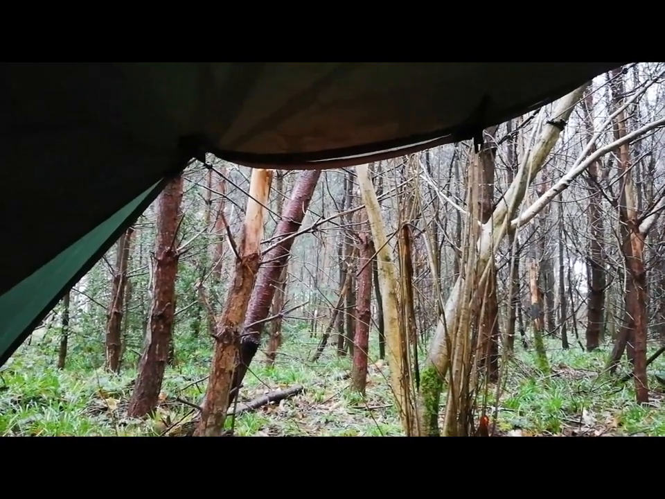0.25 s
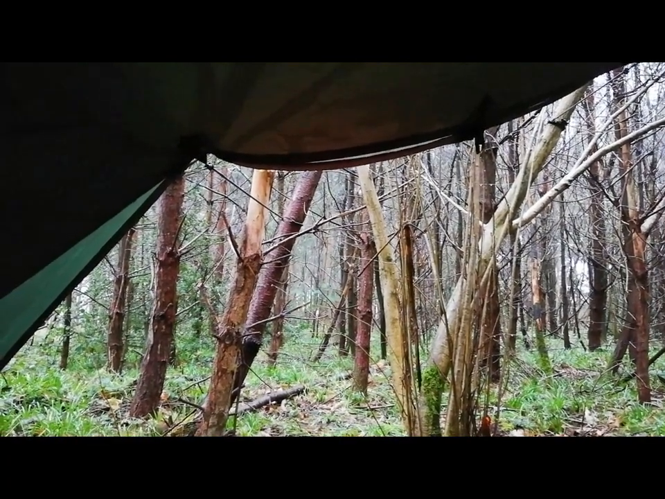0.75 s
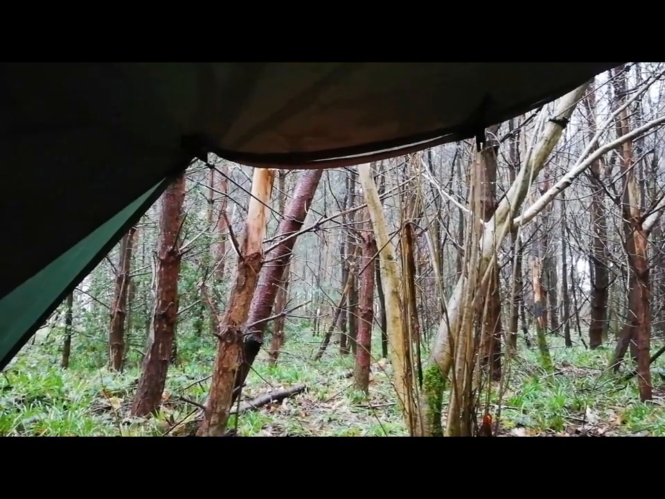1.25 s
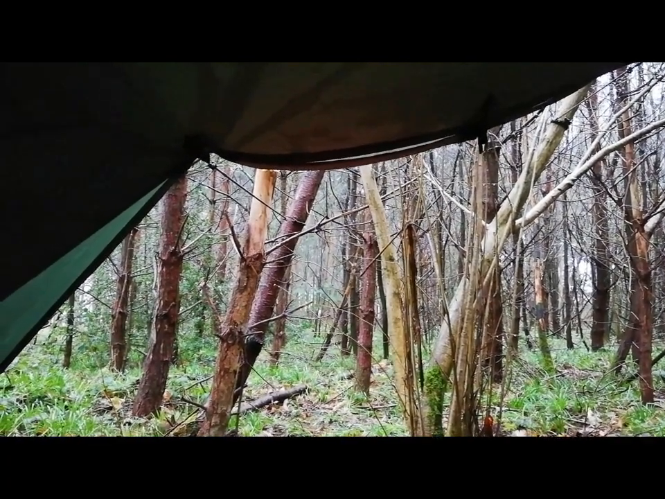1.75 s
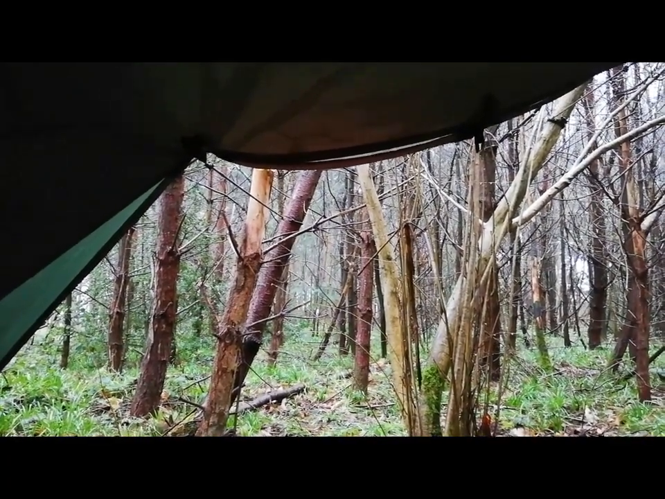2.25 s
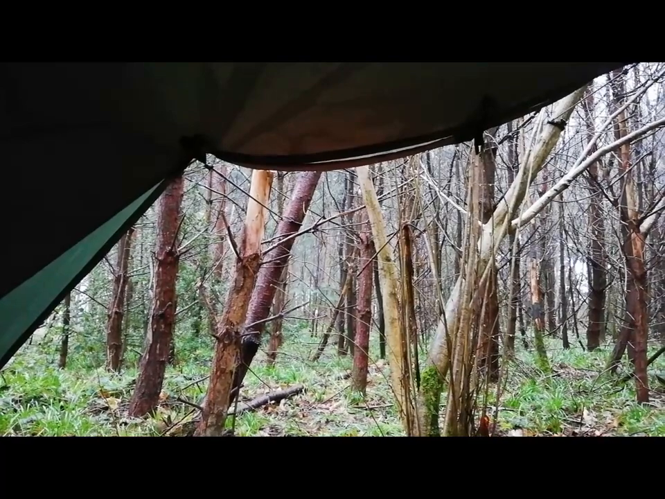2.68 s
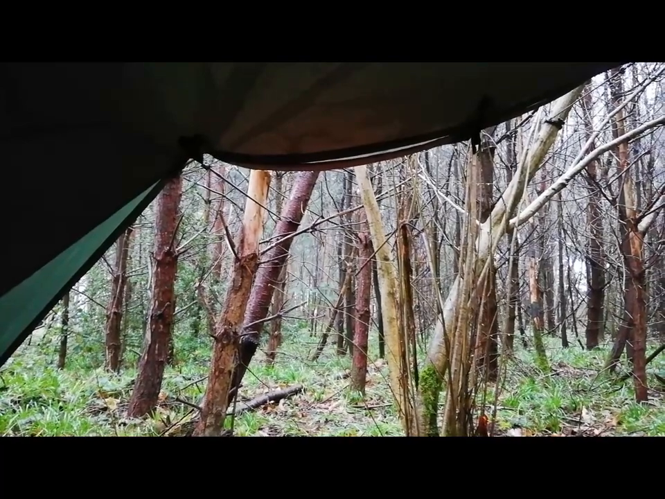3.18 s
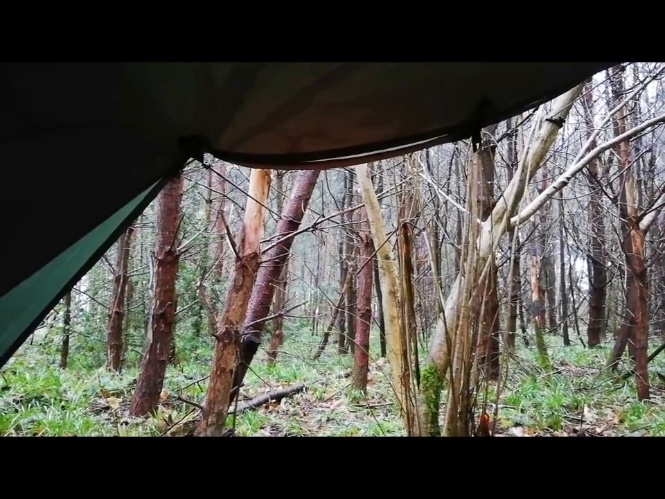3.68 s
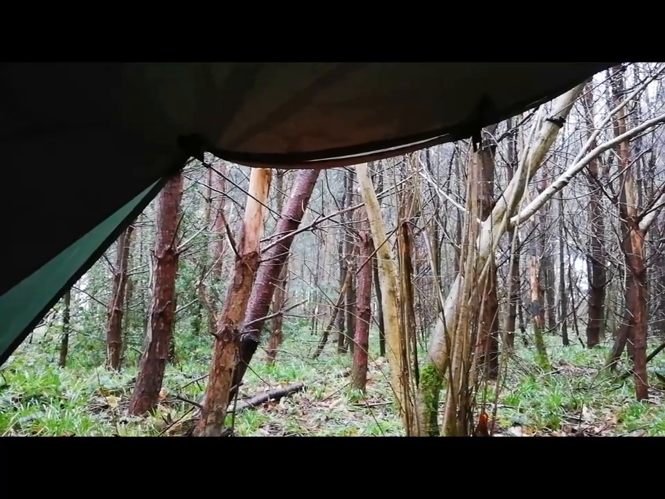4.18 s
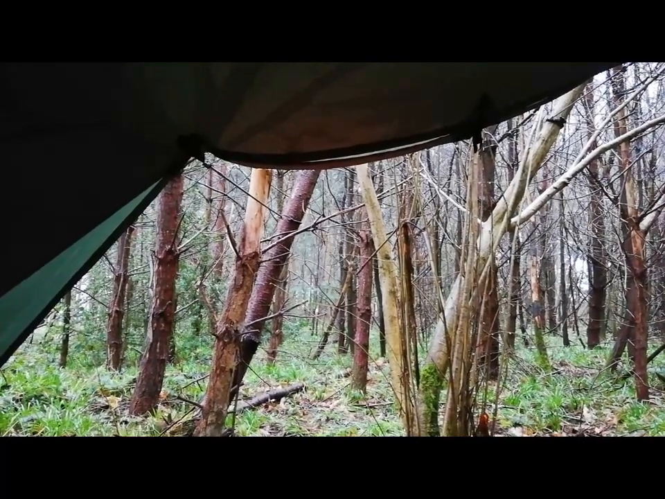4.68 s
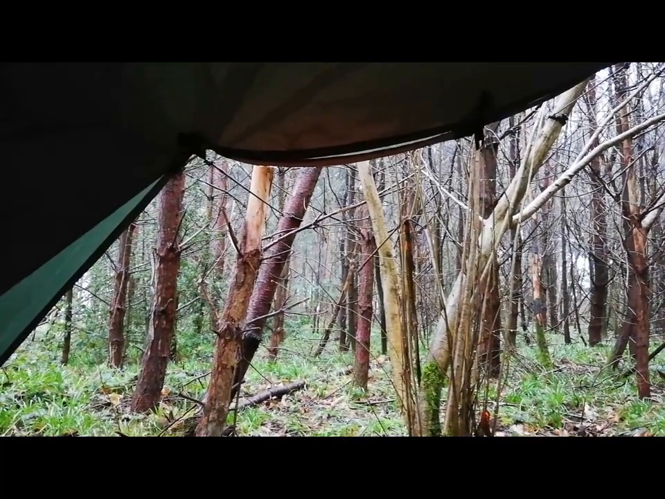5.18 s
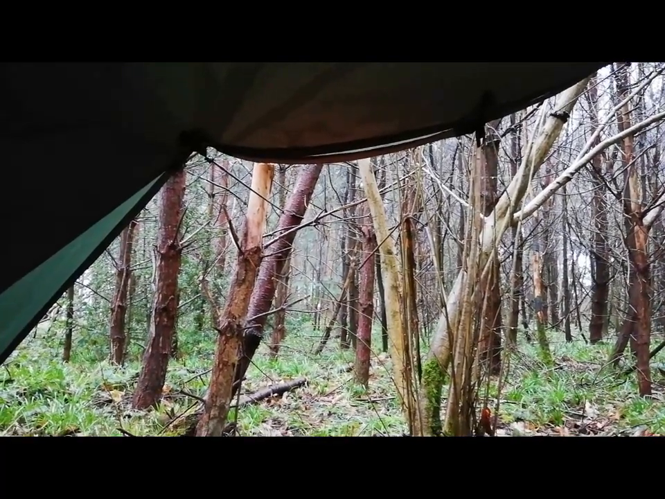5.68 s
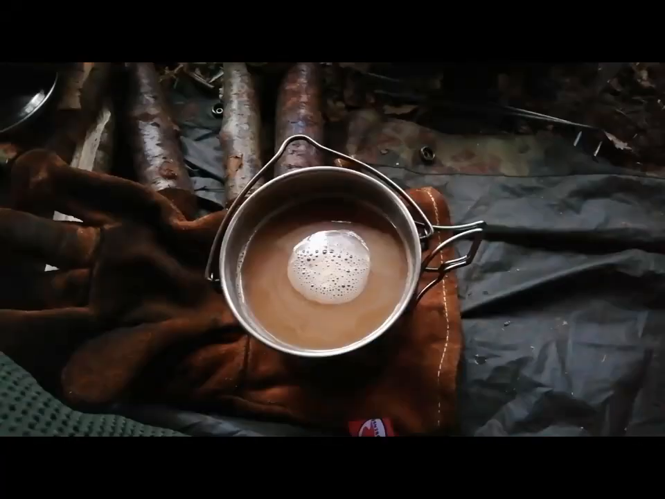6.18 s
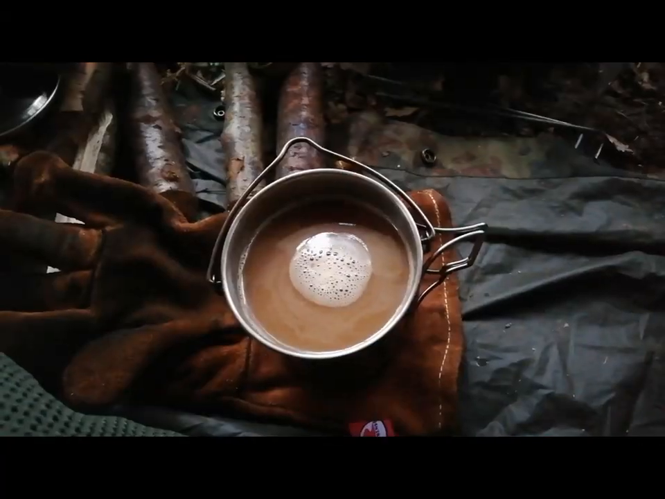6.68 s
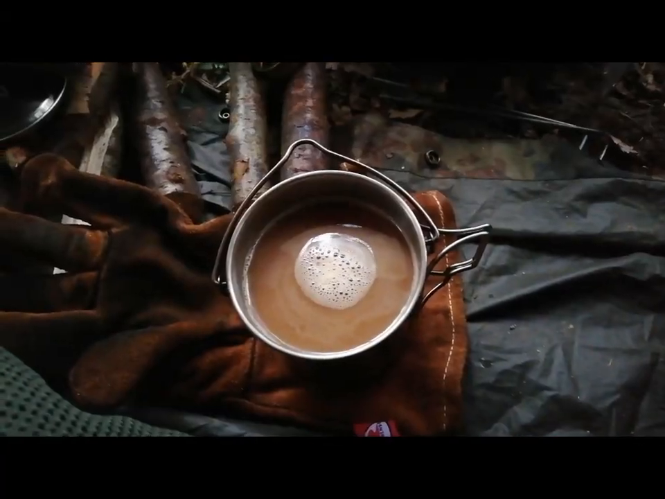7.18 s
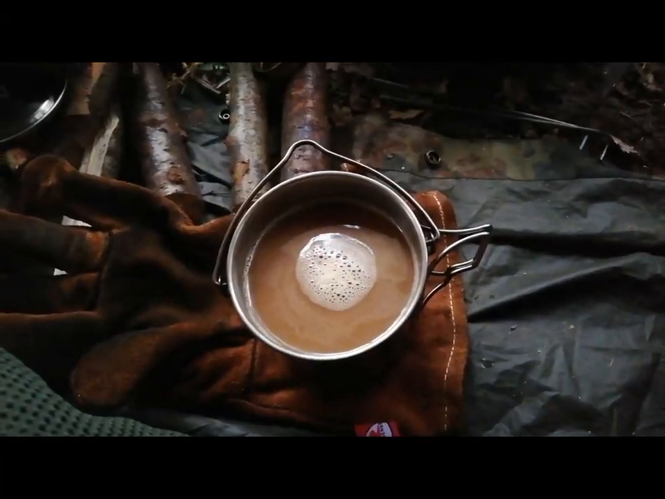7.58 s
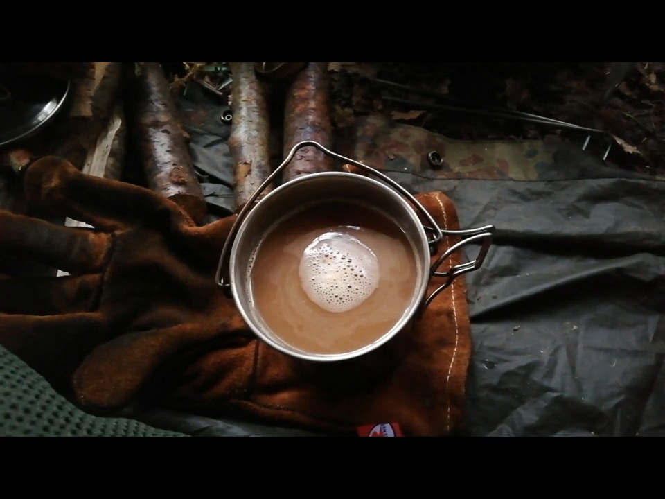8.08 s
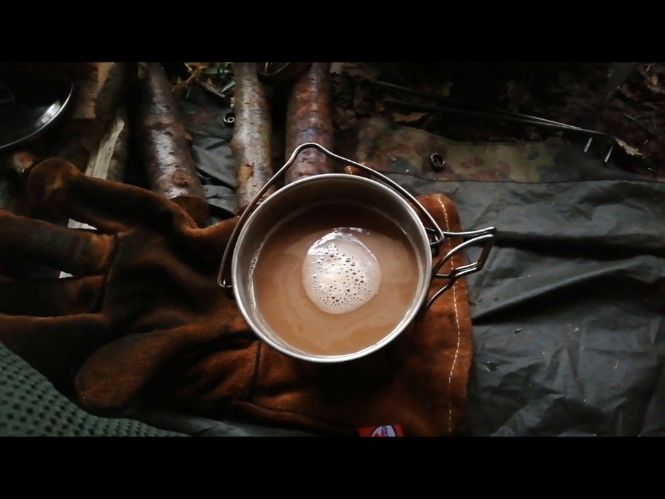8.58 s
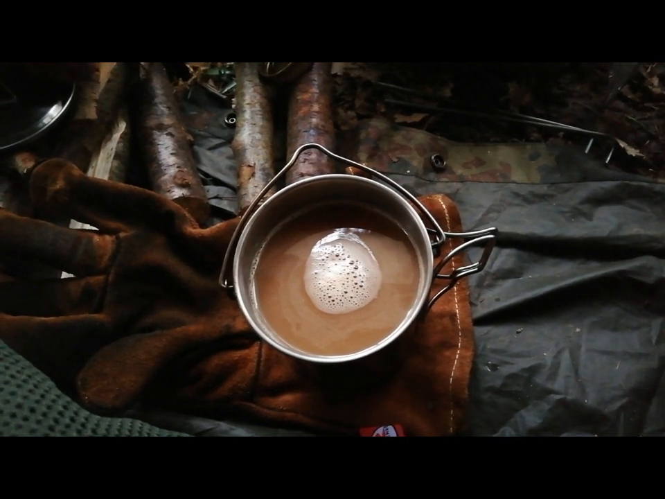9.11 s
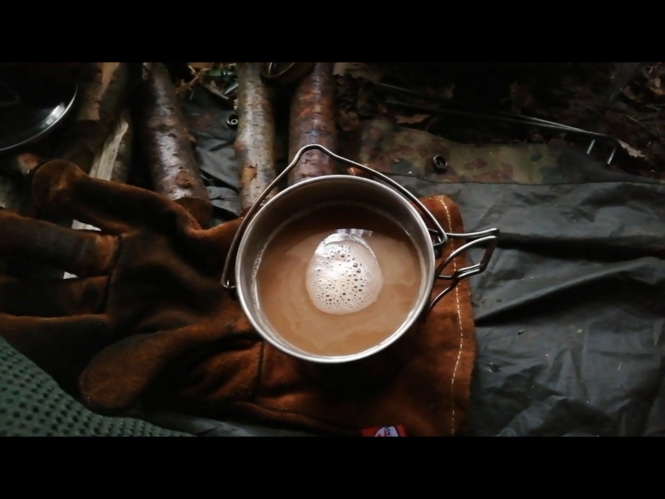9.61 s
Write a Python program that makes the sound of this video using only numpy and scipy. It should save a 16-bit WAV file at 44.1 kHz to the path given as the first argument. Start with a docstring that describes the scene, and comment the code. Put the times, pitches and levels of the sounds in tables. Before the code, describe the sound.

Rain on a tarp in woodland: soft steady hiss, fine patter and irregular sharp drips, one brief silence, then slightly lighter rain.

```python
"""Rain on a tarp in woodland

Single drips from the branches, small to heavy, are pulses, bursts and ripples of a taut sheet; the trees
return a faint echo. Fine rain patters on the tarp and ticks on leaves: random drops on many resonant spots.
Shaped noise gives a distant hiss and a low rumble; the slack sheet gives one low bump, a decaying sine.
The rain swells in short surges. The sound drops out for a moment; after that the rain is lighter."""
import sys
import numpy as np
from scipy import signal
from scipy.fft import rfft, irfft, next_fast_len
from scipy.io import wavfile
from scipy.ndimage import uniform_filter1d

SR = 44100
rng = np.random.default_rng(int(sys.argv[2]) if len(sys.argv) > 2 else 0)


def digitize_waveform(pressure):
    """Quantize a signal to 16-bit integers and store it at the path in sys.argv[1].

    Rows of a 2-D input are taken as channels; values are limited to [-1, 1].
    """
    field = np.atleast_2d(pressure).T
    bounded = np.clip(field, -1, 1)
    quanta = np.round(bounded * 32767).astype(np.int16)
    wavfile.write(sys.argv[1], SR, quanta)


N = 434385

# low rumble of the open air: f/Hz, relative level per Hz/dB
AIR_SPECTRUM = [(15, -15), (35, 1.5), (70, -1), (130, -4.5), (250, -5.5), (450, -27), (900, -45.5)]
# rain on the wood all around: f/Hz, relative level per Hz/dB
WOOD_SPECTRUM = [(120, -34.5), (200, -14.5), (262, -3.5), (451, -7), (761, -3), (1040, -2.5), (1880, 2),
                 (7020, -7), (8720, -9.5), (11200, -18), (15000, -22.5)]
# surges, when the branches shed more water: t/s at the height, width/s, added strength/dB
SURGES = [(.75, 0.75, 1), (3.33, .22, 4), (4.18, 0.078, 2), (4.66, 0.22, 4), (8.62, 0.13, 3)]
# a drop on wet leaves: f/Hz, level/dB
LEAF_SPECTRUM = [(300, -5.5), (2000, -2.5), (5000, 1.5), (8500, -3), (11500, -10.5), (15000, -18)]
# a drop on the taut sheet: f/Hz, level/dB
SHEET_SPECTRUM = [(40, -24), (110, -5.5), (220, 1), (350, 3), (500, -2.5), (1200, 5), (2600, -1),
                  (4400, -2.5), (7300, -9), (9400, -11.5), (12000, -28), (15000, -31)]
# drips that spatter on the leaf litter: t/s, level/dB, ring f/Hz, left minus right/dB
LEAF_SPATTERS = [(0.0661, -14.5, 5170, 5), (0.527, -15, 5900, 6), (0.5788, -19, 6140, -12),
                 (1.7934, -15, 7000, 6), (3.0373, -18, 4430, -9), (3.6665, -17, 5960, 3.5),
                 (4.0117, -16.5, 7500, 3), (5.5663, -14, 8600, -1), (6.3782, -10, 6960, -4),
                 (7.667, -18, 8040, 2), (8.54, -14, 7450, -2)]
# single drips on the tarp, from small to heavy: t/s, level/dB, thump/dB, spray/dB, ring f/Hz, ring/dB,
# left minus right/dB, left lag/ms
SINGLE_DRIPS = [(0.292, -10.5, -6, -4, 250, 8, 1, 0.084), (0.4039, -13, 8, 3, 1700, 10.5, -4, -0.0079),
                (0.4572, -8, -2, -14, 3300, 14, 1, -0.021), (0.5897, 2, -5.5, -2.5, 370, 15, -3.5, 0.036),
                (0.7322, -7, 2, -7, 1260, 4, 1, 0.44), (0.7646, -7.5, 9, -3, 700, 8, -4.5, 0.24),
                (0.8113, -14, 8, 7.5, 720, 14, -1, 0.56), (0.848, -2.5, 11, -4, 2000, 1, 0.5, -0.28),
                (1.038, 3, 3.5, 8, 1170, 6, -2, 0.21), (1.144, -8, 5.5, 5, 600, 15, -2.5, 0.29),
                (1.2056, -10.5, -1, -6, 2800, 11, 0, -0.28), (1.329, 3.5, 10, -6, 1800, 4.5, 0.5, -0.13),
                (1.438, -14, -21, 8.5, 1700, 5.5, 4, -0.19), (1.591, -7.5, 6, -8, 4440, 12.5, 4, -0.22),
                (1.6343, 9, 3, -13, 3260, 16, -1, -0.15), (1.7598, 4, -1, -7.5, 2320, 6, 20, 0.4),
                (2.0695, -4.5, .5, 0, 1530, 7, -1.5, 0.07), (2.2745, 1.5, -6, -9, 3860, 22, -3.5, 0),
                (2.2774, 3, -12, -0.5, 650, 8, -5, 0.41), (2.2979, -2, 0, -3, 2580, 5, 2, 0.13),
                (2.3101, -2.5, -1, -1, 1000, 2, 1, 0.024), (2.405, -14, -11, 5.5, 1900, 3, 2, -0.072),
                (2.5824, -7.5, -6.5, -2, 220, 11.5, -1, 0.1), (2.807, -13.5, 8.5, 0, 590, 8, 1, -0.28),
                (2.8866, -13, 16, -8, 1330, 15.5, 0, -0.15), (2.9244, -0.5, 4, -3, 580, 2.5, -1.5, 0.18),
                (3.1146, -11.5, 4.5, 8, 610, 16, -2, 0.51), (3.278, -18, 6, 11, 1270, 10, 2, -0.16),
                (3.368, -1, -20, -21, 1500, -5, -1, 0.2), (3.5285, 3.5, 6.5, -8, 600, 7, -0.5, 0.36),
                (4.05, -4, 4.5, -1, 5350, 13.5, 1, 0), (4.0745, -2, -15, -13, 2170, 2, 0, -.1),
                (4.1254, -8, -14, -15, 4310, 5, -1, -0.12), (4.1619, -5.5, 4, -8, 980, 11, 2, 0.37),
                (4.2234, -5.5, 16, 3.5, 3100, 12.5, 1, 0.35), (4.3921, -9.5, -19, -2, 5650, 17, -3, 0.068),
                (4.468, -9, -2, -8, 8200, 18, -3, 0.071), (4.4815, 6.5, -9.5, -6.5, 4790, 5, -1, 0.17),
                (4.5997, -10.5, 17, -20, 1070, 5, 2, 0.11), (4.6313, -6.5, -1, -20, 3160, 12, 4, -0.092),
                (4.7051, -3.5, -5, -20, 2080, 17.5, -3, 0.26), (4.7667, 0, 4.5, 5, 4830, 0, -3, 0.23),
                (4.7825, -2, 6.5, 1, 4870, 11.5, 0.5, 0.15), (4.8293, -3.5, 1, 0.5, 3960, 11, 1, 0.16),
                (5.1297, 2.5, -0.5, -6.5, 3760, 13, 0.5, 0), (5.3641, 2, 0.5, -3.5, 1880, 9, 1, .15),
                (5.3769, 10, -1.5, -14, 4440, 8, 1.5, 0.077), (5.3852, 8.5, -4.5, -6, 2370, -1, 4, 0.15),
                (5.422, 3.5, -6, -10.5, 3760, 7, 3, -0.17), (6.5337, -29.5, 23, 17, 2450, 23, 1, -0.13),
                (6.645, -12, 1, -0.5, 2270, 9, 1, 0.086), (6.7428, -15.5, -1, 0, 220, 9, -1, -0.32),
                (6.8894, 4, 3.5, -8, 2290, -1, -3.5, 0.1), (7.0072, -7.5, 9, 4, 540, 8, -2, 0.4),
                (7.263, 1.5, -1.5, -2, 530, 5, -0.5, -0.35),
                (7.3762, -2.5, 12.5, -1, 5000, 17.5, -1.5, -.1), (7.4808, -4, 4.5, 0.5, 470, 9, 2, 0.23),
                (7.75, -15.5, 17, 7, 1160, 11, -0.5, 0), (7.7855, -18.5, 4, 15, 1000, 20, -0.5, 0.14),
                (7.805, -15.5, 8, -4, 1030, 12.5, -1, -0.09), (8.1409, -18, 1, 1, 2590, 12, 1, -0.028),
                (8.1736, 1, 7.5, -5, 2450, 5, 2.5, -0.34), (8.872, -5.5, 6.5, -1.5, 5270, 14.5, -2.5, 0.14),
                (9.2975, -2, -13, -15, 2790, 15.5, -5, 0.034), (9.47, -18, 14, 3, 2400, 12, 2, -0.5),
                (9.5533, 1.5, 4.5, 1.5, 1810, 5.5, -0.5, -0.065), (9.7488, -10, 4, 9.5, 4640, 1, 4, -0.31),
                (9.7956, 3, 0.5, -7, 4200, 6, 2.5, 0.18), (9.8138, -5, 1, 4, 560, 10, 1, -0.67)]
# where a drip's thump, body, snap, spray and finest mist lie: f/Hz
DRIP_TONE_HZ = [220, 1200, 4000, 8500, 12000]
# the trees' echo: f/Hz, level/dB
ECHO_SPECTRUM = [(150, -12), (450, -3.5), (1200, -4.5), (4000, 3), (8000, 6), (14000, 2)]
# the two ports differ in brightness: f/Hz, left minus right/dB
PORT_DIFFERENCE = [(200, 0), (700, -1.5), (2000, -1.6), (4400, 1), (8300, 9.5), (11000, 2.5), (15000, 1)]

# strength of the rain before and after the silence; each layer follows it by its own factor
SHOWER_DB, LIGHTER_DB = 0.7, -0.93
SILENCE_START_S, SILENCE_END_S = 5.95, 6.35
FLAP_S = 5.851
SNAP_SHARE = 0.79  # a drip's snap grows with its spray
MIST_PER_DB = 0.55  # harder drips burst into finer mist
# ripple of a 0 dB drip; fainter drips land farther off and arrive with more ripple
RIPPLE_DB, RIPPLE_PER_DB = -2.5, -0.2
LEAD_S = 0.0007  # room for the earlier port ahead of each impact
TOP_HZ = 15400

SIZE = 4096  # samples in one impact
TIME = np.arange(N) / SR
AGE = np.arange(SIZE) / SR
BINS = np.fft.rfftfreq(SIZE, 1 / SR)
SIDES = np.array([[1], [-1]])  # left, right


def undb(db):
    """Level to amplitude: 20 dB is a factor of ten."""
    return 10 ** (np.asarray(db) / 20)


def unit(x):
    """Energy is the sum of squares; scale each channel to energy 1."""
    return x / np.sqrt(np.sum(x ** 2, axis=-1, keepdims=True))


def level(x, db):
    """The rms amplitude sets the mean power; scale it to a level."""
    return x * undb(db) / np.sqrt(np.mean(x ** 2))


def slope(points, hz):
    """Spectral level is read between points on a logarithmic frequency axis."""
    f, db = np.transpose(points)
    return np.interp(np.log(hz + 1), np.log(f), db)


def colour(x, points, share=1):
    """Linear filtering multiplies the spectrum by a gain, here a share of the points' dB."""
    size = next_fast_len(N + SIZE)
    gain = undb(share * slope(points, np.fft.rfftfreq(size, 1 / SR)))
    return irfft(rfft(x, size) * gain, size)[..., :N]


def causal(db):
    """Minimum phase: folding the cepstrum makes a response start at once and then die away."""
    cepstrum = irfft(np.log(undb(db)))
    cepstrum[1:SIZE // 2] *= 2
    cepstrum[SIZE // 2 + 1:] = 0
    return np.exp(rfft(cepstrum))


def delay(s):
    """A delay is a phase lag proportional to frequency."""
    return np.exp(-2j * np.pi * BINS * s)


def ring(hz, width):
    """Resonance: a hump of height 1 and relative width; wet fabric damps the low rings most."""
    damping_hz = 55
    return 1 / (1 + (np.log((BINS + 1) / hz) / (width + damping_hz / hz)) ** 2)


def walk(rate):
    """Slow random fluctuation: random values, rate per second, joined by lines; spread near 1."""
    knots = rng.standard_normal(1024)
    return np.interp(TIME * rate, np.arange(len(knots)), knots)


def add(out, s, sound):
    """Superposition: mix a short stereo sound in at a time."""
    start = max(int(s * SR), 0)
    out[:, start:start + SIZE] += sound[:, :max(N - start, 0)]


def shower():
    """Rain strength in dB: steady, with Gaussian surges that swell and ebb, lighter after the silence."""
    steady = np.where(TIME < SILENCE_END_S, SHOWER_DB, LIGHTER_DB)
    return steady + sum(db * np.exp(-((TIME - s) / width) ** 2) for s, width, db in SURGES)


def air(side_db=-17):
    """Coherence at long wavelengths: a faint rumble is nearly the same at both ports."""
    noise = rng.standard_normal((3, N))
    return colour(noise[2] + undb(side_db) * noise[:2], AIR_SPECTRUM)


def hiss(likeness=0.081):
    """Incoherent summation: countless far drops merge into a steady hiss that flickers only slightly."""
    noise = rng.standard_normal((3, N))
    flicker_db = 0.6 * walk(70)
    return colour(noise[:2] + likeness * noise[2], WOOD_SPECTRUM) * undb(flicker_db)


def flap(hz=48, decay_s=0.0089, db=-33):
    """Damped oscillation: the slack sheet gives one soft, low bump."""
    age = np.maximum(TIME - FLAP_S, 0)
    return undb(db) * np.sin(2 * np.pi * hz * age) * np.exp(-age / decay_s)


def splash(db, ripple_db, pan_db, lag_ms, scatter_s=0.0012, scatter_db=-5):
    """Impact: a pressure pulse and its bounce, the drop's burst, then ripples over the struck surface."""
    ripple_s, wide_hz, soft_hz, bounce_db = 0.0077, 340, 4300, -10
    noise = rng.standard_normal((4, SIZE))
    # the drop flattens as it lands: the pulse is rounded, and its treble goes into the burst
    firm = 1 / (1 + (BINS / soft_hz) ** 2)
    # the sloping roof throws the pulse back a moment later, which combs each tap differently
    bounce = undb(bounce_db) * delay(rng.uniform(0.00045, 0.002125))
    pulse = np.sqrt(firm) * (1 + bounce)
    burst_gain = np.sqrt(undb(scatter_db) ** 2 + 1 - firm)
    burst = burst_gain * rfft(unit(noise[:2] * np.exp(-AGE / scatter_s)))
    ripple = undb(ripple_db) * rfft(unit(noise[2:] * np.exp(-AGE / ripple_s)))
    mid, side = burst + ripple
    # long waves reach both ports alike, short ones differently
    apart = 0.5 * BINS ** 2 / (BINS ** 2 + wide_hz ** 2)
    spread = np.sqrt(1 - apart) * mid + SIDES * np.sqrt(apart) * side
    direction = undb(SIDES * pan_db / 2) * delay(LEAD_S + SIDES * lag_ms / 2e3)
    energy = 1 + undb(scatter_db) ** 2 + undb(ripple_db) ** 2
    return irfft((pulse + spread) * causal(db) * direction) / np.sqrt(energy)


def patter(surface, rate, low_hz, high_hz, ring_db, ring_width, spread_db, ripple_db, count):
    """Random arrivals: drops, rate per second, fall on spots with their own ring and direction."""
    out = np.zeros((2, N))
    spots = []
    for pitch, place in rng.random((count, 2)):
        hz = low_hz * (high_hz / low_hz) ** pitch
        spectrum = slope(surface, BINS) + ring_db * ring(hz, ring_width)
        spots.append(splash(spectrum, ripple_db, 7 * (place - 0.5), 0.86 * (0.5 - place)))
    for when, where, weight in rng.random((int(rate * N / SR), 3)):
        # a few drops are larger
        size_db = -spread_db * np.log(weight + 0.025)
        add(out, when * N / SR, undb(size_db) * spots[int(where * count)])
    # the branches shed their water in little flurries
    flurry_db = 2.2 * walk(18)
    return out * undb(flurry_db)


def leaf_ticks():
    """Small resonators ring high: drops tick on wet leaves."""
    return patter(LEAF_SPECTRUM, rate=130, low_hz=2200, high_hz=8200, ring_db=10, ring_width=0.15,
                  spread_db=5, ripple_db=0, count=140)


def fine_rain():
    """Many small impacts: fine rain excites the tarp's local resonances."""
    return patter(SHEET_SPECTRUM, rate=170, low_hz=900, high_hz=3800, ring_db=10, ring_width=0.19,
                  spread_db=4.2, ripple_db=-2, count=100)


def light_drips():
    """Sparse impacts: light drips, closer to one size, ring the tarp down to a lower pitch."""
    return patter(SHEET_SPECTRUM, rate=14, low_hz=500, high_hz=3400, ring_db=10, ring_width=0.14,
                  spread_db=1, ripple_db=1, count=40)


def spatters(ring_db=5, ripple_db=2):
    """Break-up of a drop: drips that miss the tarp burst on the leaves with a bright, smeared tick."""
    out = np.zeros((2, N))
    for s, db, hz, pan_db in LEAF_SPATTERS:
        spectrum = db + slope(LEAF_SPECTRUM, BINS) + ring_db * ring(hz, 0.22)
        add(out, s, splash(spectrum, ripple_db, pan_db, 0, scatter_s=0.0025, scatter_db=7.5))
    return out


def single_drips(ring_width=0.13):
    """Membrane resonance: each drip, small or heavy, strikes its own patch of tarp, with its own tension."""
    out = np.zeros((2, N))
    for s, db, thump, spray, hz, ring_db, pan_db, lag_ms in SINGLE_DRIPS:
        tone_db = [thump, 0, SNAP_SHARE * spray, spray, spray + MIST_PER_DB * db]
        tone = slope(list(zip(DRIP_TONE_HZ, tone_db)), BINS)
        spectrum = db + slope(SHEET_SPECTRUM, BINS) + tone + ring_db * ring(hz, ring_width)
        add(out, s - LEAD_S, splash(spectrum, RIPPLE_DB + RIPPLE_PER_DB * db, pan_db, lag_ms))
    return out


def trees(x, t60=0.11):
    """Diffuse scattering: trunks and ground turn each tap into a thin, short echo, 60 dB down after t60/s."""
    age = np.arange(SR // 2) / SR
    decay = undb(-60 * age / t60)
    onset = 1 - np.exp(-age / 0.003)
    response = unit(rng.standard_normal((2, len(age))) * decay * onset)
    return colour(signal.oaconvolve(x, response, axes=1)[:, :N], ECHO_SPECTRUM)


def scene():
    """Superposition: rain strength drives hiss, ticks, patter and light drips; single drips fall on top."""
    shower_db = shower()
    # rms levels are those at zero rain strength
    far = level(hiss(), -56.5) * undb(0.76 * shower_db) + level(air(), -65.5)
    leaves = level(leaf_ticks(), -59.0) * undb(1.1 * shower_db)
    tarp = (level(fine_rain(), -57.0) + level(light_drips(), -62.5)) * undb(1.91 * shower_db)
    taps = leaves + tarp + spatters() + single_drips()
    echo = undb(-13) * trees(taps)
    return far + flap() + taps + echo


def record(dry):
    """Reception: two ports of unequal brightness, a moment of silence, and a steep low-pass cut."""
    sound = colour(dry, PORT_DIFFERENCE, share=SIDES / 2)
    live = 1.0 * ((TIME < SILENCE_START_S) | (TIME > SILENCE_END_S))
    gate = uniform_filter1d(live, size=200)  # ramps of 4.5 ms
    low_pass = signal.ellip(8, 0.2, 70, TOP_HZ, fs=SR, output="sos")
    return signal.sosfilt(low_pass, sound * gate)


dry = scene()
out = record(dry)
digitize_waveform(out)
```